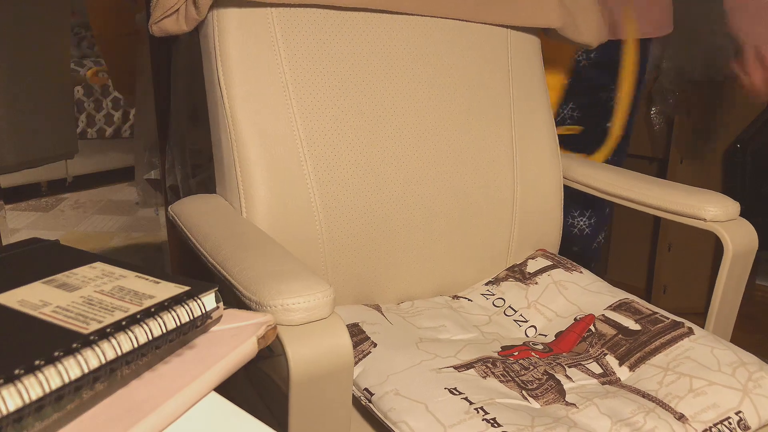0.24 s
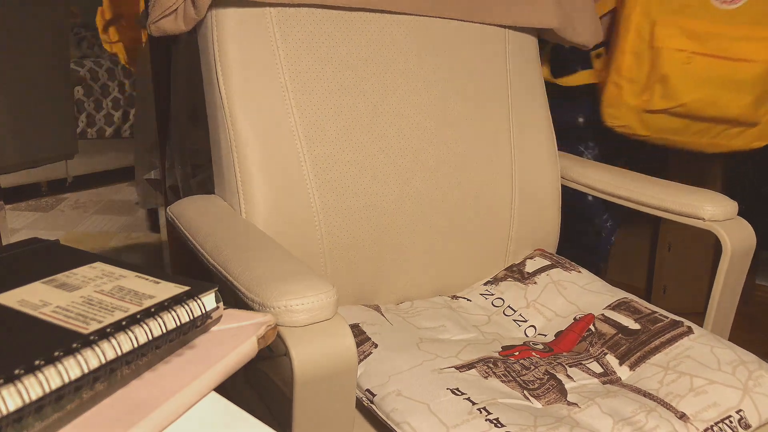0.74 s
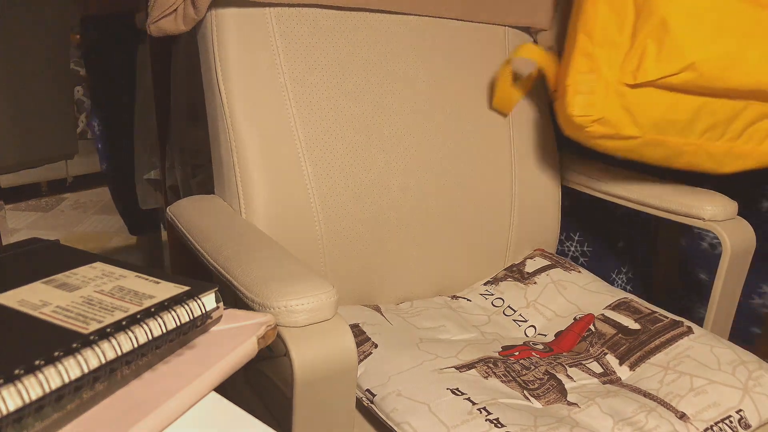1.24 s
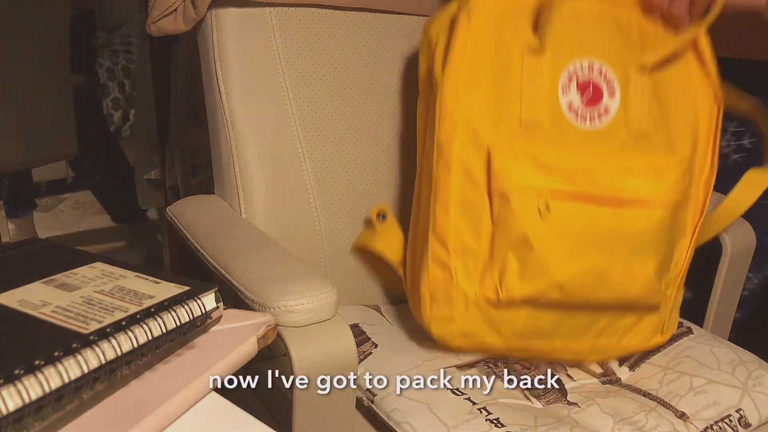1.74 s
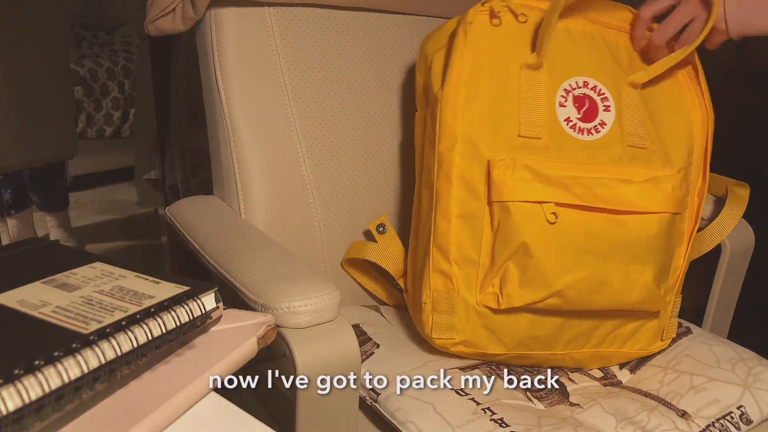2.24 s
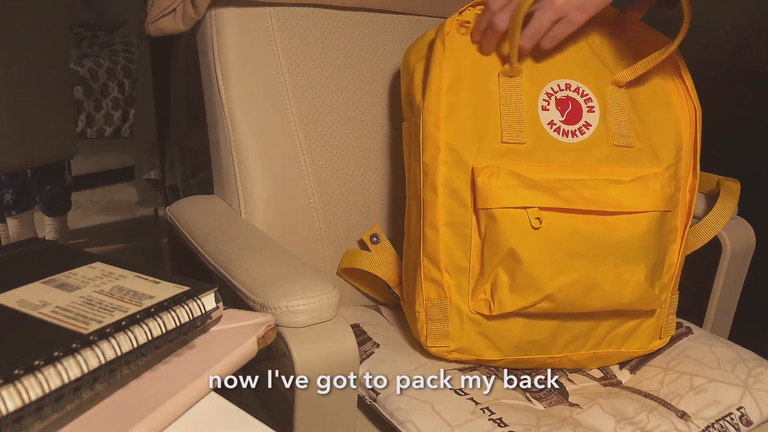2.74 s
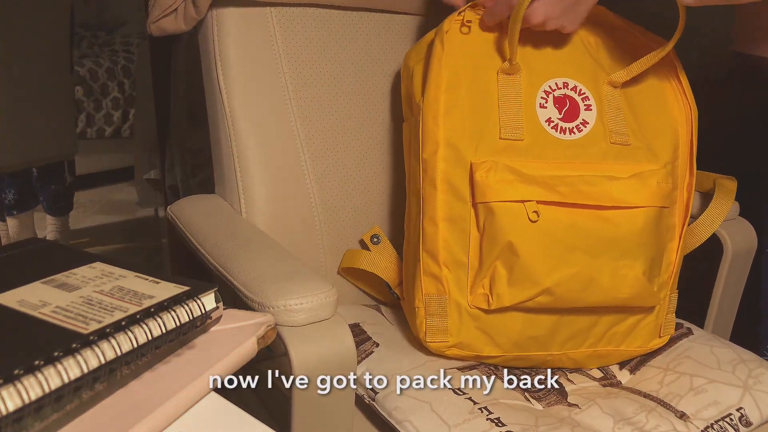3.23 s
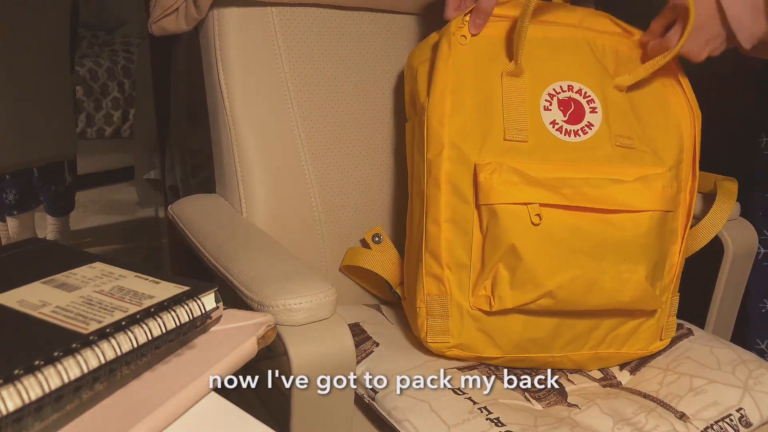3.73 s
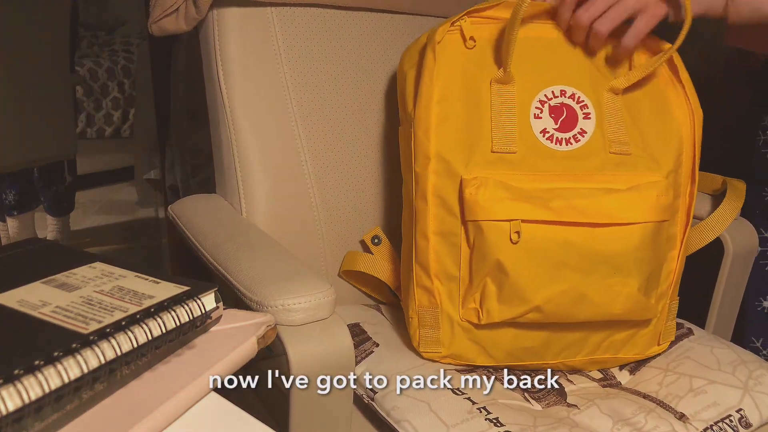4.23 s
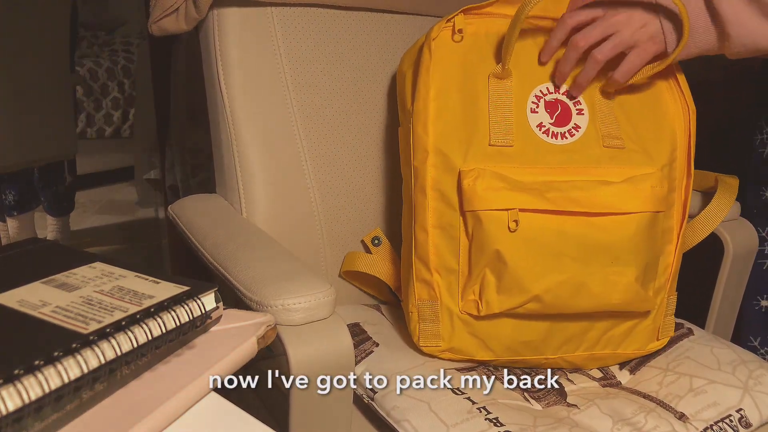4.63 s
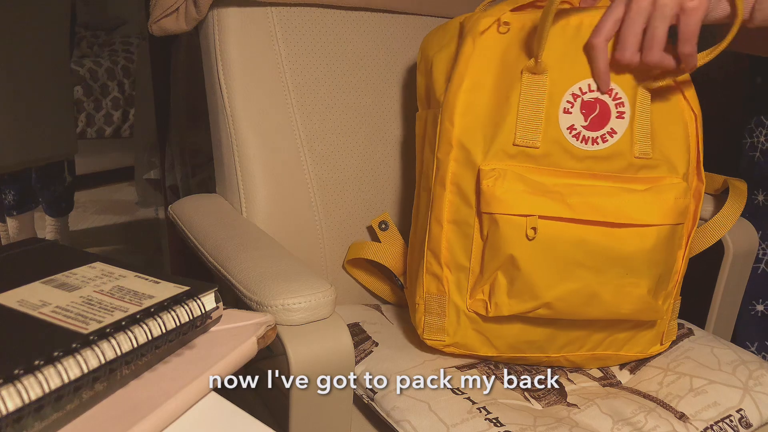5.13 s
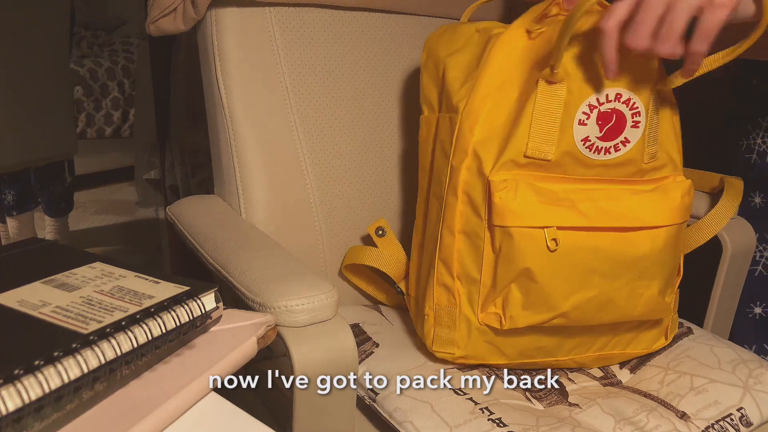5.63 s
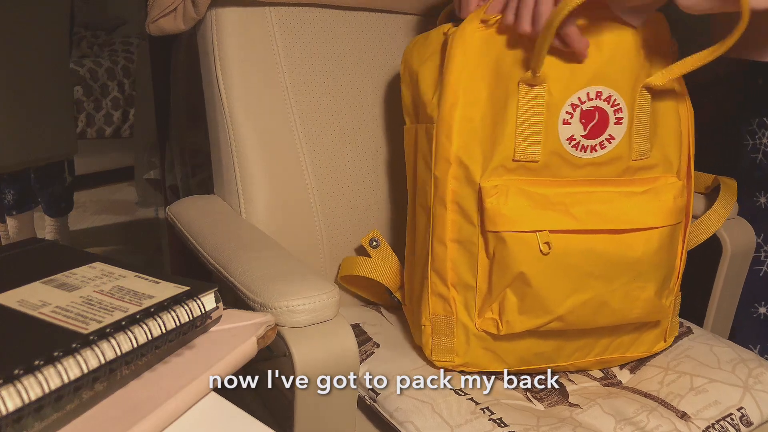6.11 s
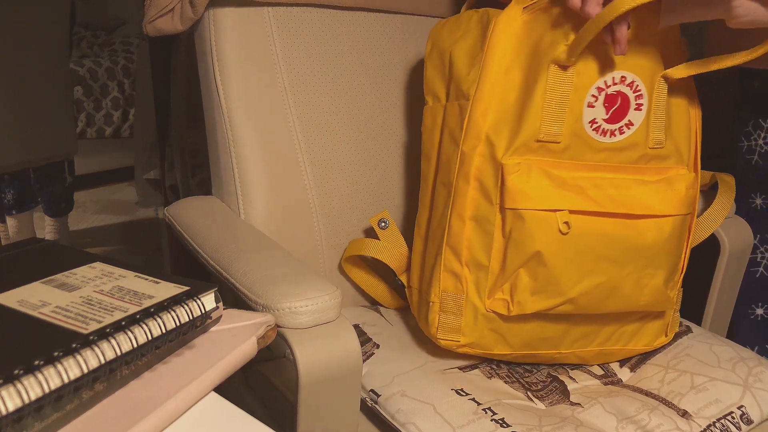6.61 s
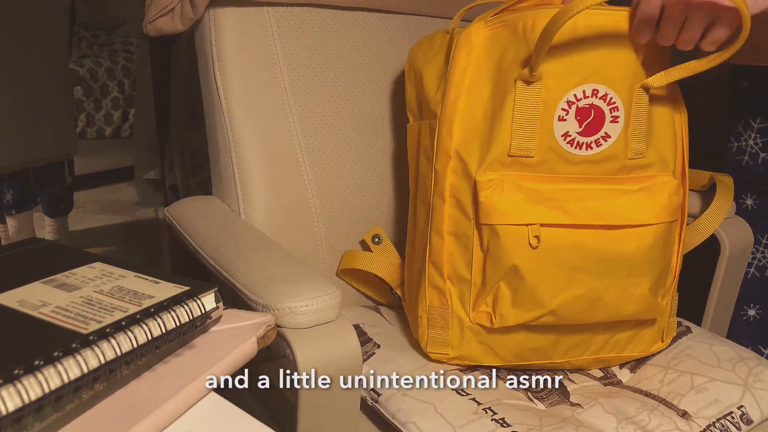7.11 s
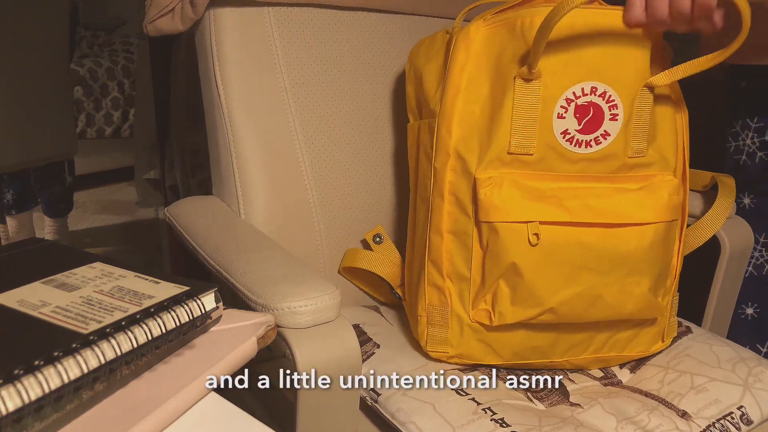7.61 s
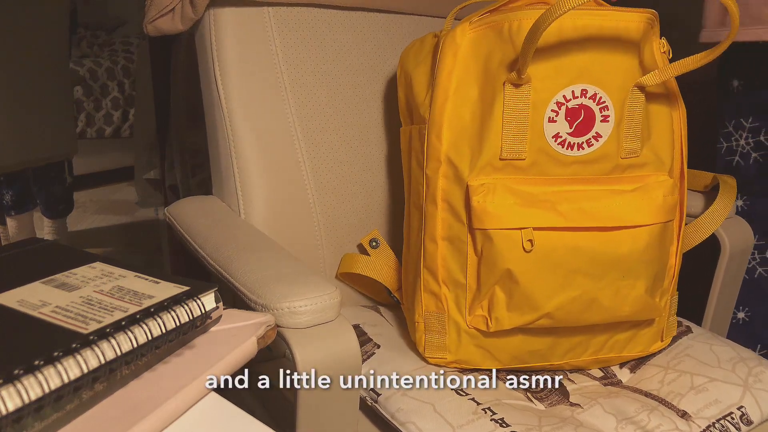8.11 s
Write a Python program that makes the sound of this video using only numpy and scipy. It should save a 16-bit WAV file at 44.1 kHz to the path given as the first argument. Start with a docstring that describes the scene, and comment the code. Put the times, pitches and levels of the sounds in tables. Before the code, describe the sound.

A canvas backpack lands on a padded chair with jingling metal, then short zipper rasps, cloth rubbing and hollow bumps in a quiet room.

```python
"""A small quiet room with one microphone near a chair: a canvas backpack is lifted onto it and handled.
The zipper is pulled in three strokes and a few single slips: tooth after tooth excites the tape and the bag.
Hands keep rubbing the cloth, made of dense random slips; bumps ring the hollow bag as a set of modes.
The metal pull tab jingles and rattles on its slider, and a plastic part is tapped.
Behind it lie sparse room reflections, a low rumble of the chair, and air and microphone hiss."""
import sys
import numpy as np
from scipy import signal
from scipy.io import wavfile
from scipy.ndimage import uniform_filter1d

SR = 44100
rng = np.random.default_rng(int(sys.argv[2]) if len(sys.argv) > 2 else 0)


def digitize_waveform(pressure):
    """Quantize a signal to 16-bit integers and store it at the path in sys.argv[1].

    Rows of a 2-D input are taken as channels; values are limited to [-1, 1].
    """
    field = np.atleast_2d(pressure).T
    bounded = np.clip(field, -1, 1)
    quanta = np.round(bounded * 32767).astype(np.int16)
    wavfile.write(sys.argv[1], SR, quanta)


N = 368543  # length in samples

# The zipper strokes, one list a stroke. Each row: time in s, teeth per s, pitch of the taut tape in Hz.
STROKE_SPEEDS = [
    [(2.722, 200, 1000), (2.775, 270, 1250), (2.8, 310, 2600), (2.83, 320, 3050), (2.89, 260, 3100),
     (2.92, 190, 2000), (2.96, 150, 1500)],
    [(3.34, 70, 1500), (3.375, 130, 1500), (3.4, 280, 1400), (3.43, 412, 1350), (3.455, 450, 1500),
     (3.478, 515, 1600), (3.52, 560, 1700), (3.535, 500, 1450), (3.565, 480, 1400), (3.585, 345, 1300),
     (3.608, 270, 1300), (3.63, 140, 1350), (3.71, 50, 1200)],
    [(5.285, 85, 1400), (5.35, 135, 1300), (5.39, 120, 1400), (5.43, 75, 1400)],
]
# The same strokes. Each row: time in s, thump into the large panels in dB, into the small panels in dB,
# knock of the teeth in dB.
STROKE_FORCES = [
    [(2.72, -62, -65, -62), (2.74, -54, -62, -59), (2.77, -57, -49, -44.5), (2.89, -55.5, -45.5, -47.5),
     (2.96, -64, -71, -64.5)],
    [(3.34, -50, -65, -67), (3.366, -46, -49, -54.5), (3.408, -42.5, -39.5, -46), (3.44, -35.5, -38, -38.5),
     (3.5, -34.5, -47.5, -37.5), (3.572, -28.5, -38, -41), (3.598, -35.5, -46, -43.5),
     (3.648, -42, -42.5, -54), (3.71, -47, -74, -66)],
    [(5.285, -53, -44.5, -53.5), (5.38, -43, -46.5, -52), (5.43, -43, -42.5, -60)],
]
# Each row, one a stroke: snagging of a slow pull (0-2), scraping against knock in dB.
STROKE_TRAITS = [(1.5, -2.5), (.4, -7), (0.55, -3.5)]
# A tooth's knock on the tape. Each row: frequency in Hz, level in dB.
TOOTH_SPECTRUM = [(400, -36.5), (900, 8.5), (1500, 8), (2300, 5.5), (3300, -3.5), (5000, -12), (9000, -35)]
# Scraping of the slider. Each row: frequency in Hz, level in dB.
SCRAPE_SPECTRUM = [(600, -21), (1200, 0), (2200, 0.5), (3500, 6), (5000, 1), (8000, -3), (12000, -6),
                   (16000, -3)]
# Single teeth letting go and bumps of the bag. Each row: time in s, thump peak in dB, tick peak in dB.
POPS = [(0.159, -52, -70), (0.338, -50, -70.5), (0.435, -51, -61), (0.611, -55, -71), (1.076, -41.5, -56),
        (1.235, -59, -45), (1.254, -46, -62), (1.777, -51, -36), (1.809, -49, -32.5), (1.866, -38.5, -38),
        (2.09, -53, -41), (2.17, -60, -48), (2.692, -50.5, -70), (2.725, -57, -57), (2.776, -43, -37),
        (3.316, -69, -49), (3.348, -45, -50), (3.749, -32.5, -38), (3.971, -43, -44), (4.038, -35.5, -46),
        (4.101, -28, -30.5), (4.157, -37, -36), (4.184, -59, -41), (4.25, -41, -36), (4.313, -56, -41),
        (4.362, -38.5, -60), (4.738, -53, -60), (4.837, -42.5, -64.5), (4.992, -53, -49), (5.018, -45, -52),
        (5.074, -32, -36), (5.112, -32, -31), (5.135, -41, -36), (5.164, -31, -31), (5.198, -38, -26.5),
        (5.213, -37.5, -51), (5.232, -45, -49), (5.256, -41, -55), (5.274, -38, -39), (5.379, -30.5, -37),
        (5.438, -32, -37), (5.457, -30.5, -57.5), (5.474, -54, -40), (5.507, -32.5, -24.5),
        (5.7, -43.5, -46.5), (6.068, -44, -43), (6.116, -31, -62), (6.206, -35.5, -50), (6.235, -52, -45.5),
        (6.307, -32, -41), (6.385, -29.5, -37.5), (6.415, -60, -38), (6.483, -31, -34),
        (6.55, -30.5, -36.5), (6.838, -42.5, -41.5), (6.862, -44.5, -65.5), (7.046, -57.5, -81),
        (7.333, -48, -67), (7.482, -54, -62)]
# A tooth's edge. Each row: frequency in Hz, level in dB per Hz.
CONTACT_SPECTRUM = [(800, -2.5), (2000, 6), (4500, 3.5), (8000, -5.5), (16000, -9.5)]
# The hollow bag, large panels first. Each row: mode in Hz, level in dB, t60 in s.
BAG_MODES = [(141, -6, 0.11), (238.5, -6, 0.17), (273.8, 1, 0.1), (315, 3.5, 0.066), (369, -15, 0.14),
             (499, -6.5, 0.041), (545.5, -2.5, 0.046), (605, -29, 0.0072), (724, -7.5, 0.04),
             (1018, -17, 0.1), (964, -22.5, 0.07), (1385, -12.5, 0.044), (1730, -14.5, 0.024)]
# The pull tab hits the slider. Each row: time in s, clack peak in dB, high ring peak in dB, low ring peak in dB.
JINGLES = [(1.814, -29, -54, -50), (1.8317, -34, -45, -61), (1.8647, -50, -62, -61),
           (1.8906, -36, -59, -42), (1.897, -23.5, -53, -57), (1.9065, -37, -44, -57),
           (1.921, -38, -55, -56), (1.944, -20.5, -33, -52), (1.9603, -27, -46, -34),
           (1.983, -36, -47, -47), (2.092, -32, -67, -66), (2.186, -40, -55, -75), (2.2603, -45, -63, -69),
           (2.874, -33, -50, -55), (4.0104, -30.5, -38, -46), (4.111, -40, -32, -52),
           (4.156, -18, -52, -59), (4.164, -43, -52, -55), (4.586, -23.5, -37, -38),
           (4.8544, -51, -52, -63), (5.0792, -30, -52, -58), (5.1175, -30, -48, -50),
           (5.143, -34, -46, -43), (5.17, -40, -42, -42), (5.199, -42, -32.5, -41), (5.3502, -49, -49, -65),
           (5.5073, -30, -45, -48), (5.5298, -53, -51, -45), (5.799, -42, -43, -67), (5.853, -48, -54, -65)]
# The loose tab keeps rattling. Each row: start in s, length in s, high ring in dB, low ring in dB.
RATTLES = [(1.803, 0.057, -57, -58), (1.887, 0.13, -69, -52), (4.092, 0.18, -63, -62),
           (5.072, 0.15, -54, -58.5), (5.171, 0.094, -54, -52), (5.495, 0.082, -50, -50.5),
           (5.782, 0.092, -60, -65)]
# The slider body, before any damping. Each row: mode in Hz, level in dB, t60 in s.
SLIDER_MODES = [(8600, -17, 0.0037), (8630, -12, 0.017), (10100, 1.5, 0.004), (10900, -36, 0.0091),
                (14630, -5.5, 0.007), (16600, -5, 0.015)]
# The pull tab's close high pair, before any damping. Each row: mode in Hz, level in dB, t60 in s.
TAB_HIGH_MODES = [(12780, -2, .055), (12920, 0, .055)]
# The pull tab's low modes, before any damping. Each row: mode in Hz, level in dB, t60 in s.
TAB_LOW_MODES = [(5610, 0, .06), (7620, -5, .05)]
# A plastic part is tapped and bounces. Each row: time in s, level in dB, pitch in Hz.
BUCKLE_TAPS = [(2.348, -36, 2740), (2.365, -43, 2550), (2.379, -45, 2550)]
# Hands grip and slide on the canvas, one row a move. Each row: start in s, length in s, share of it spent
# swelling (0-1), push on the panels in dB, drag on the seams in dB, slide in dB, brightness in dB.
HAND_MOVES = [(0, 0.094, 0, -54.5, -64, -66.5, 0.5), (0.156, 0.15, 0.2, -53, -65, -68.5, 1),
              (0.325, 0.055, 0.4, -57, -65, -73, 0), (0.383, 0.18, 0.44, -56, -64, -72, 0),
              (0.606, 0.14, 0.5, -60.5, -72.5, -79, 4), (0.805, 0.17, .26, -55.5, -67, -64, 1.5),
              (0.938, 0.15, 0.56, -53.5, -60.5, -59, 3.5), (1.024, 0.17, 0.63, -51, -71, -58, 4),
              (1.156, 0.18, 0.5, -50, -73, -60, 4.5), (1.295, 0.12, 0.27, -53, -66, -63.5, 1),
              (1.41, 0.098, 0.5, -63, -73, -76, -3), (1.483, 0.12, 0.84, -51.5, -58.5, -59, -3),
              (1.573, 0.34, 0.22, -55, -62, -58, 0.5), (1.744, 0.18, 0.27, -40, -53, -55, 2.5),
              (1.878, .14, 0.17, -46, -55, -57.5, 6), (2.061, 0.12, 0.62, -49, -57, -57.5, -2),
              (2.155, 0.082, 0.3, -53, -53, -51, -1), (2.248, 0.1, 0.4, -53.5, -51.5, -58.5, 2),
              (2.34, 0.068, 0.2, -55, -64, -53.5, -3), (2.383, 0.14, 0, -50.5, -53.5, -60, -8),
              (2.507, .15, 0.2, -54, -53.5, -59, -15.5), (2.934, 0.07, 0.4, -53, -56.5, -60.5, 9),
              (3.014, 0.042, .33, -54, -54, -59, 6), (3.091, 0.14, 0.54, -70, -66.5, -66, 3.5),
              (3.233, 0.2, 0.95, -59, -65, -67.5, 3), (3.711, 0.15, 0, -50.5, -60, -66.5, -1),
              (3.78, 0.25, 0.63, -57, -56.5, -60, -15), (3.968, 0.18, 0.38, -54, -54.5, -57.5, 6.5),
              (4.053, 0.16, 0.64, -45.5, -48.5, -51.5, 7.5), (4.216, .11, 0.48, -52, -50.5, -57.5, -4),
              (4.318, 0.24, 0.1, -52, -47.5, -56.5, 2), (4.463, 0.13, 0.93, -53.5, -47, -52, 0.5),
              (4.572, 0.095, 0.5, -48.5, -48, -67, 14.5), (4.7, 0.084, 0.78, -57.5, -59.5, -67.5, -7),
              (4.773, 0.096, 0.51, -51, -59, -58, 3), (4.86, 0.18, 0.22, -52, -62, -60.5, 6),
              (5.001, 0.063, 0.34, -48, -52.5, -54.5, 4.5), (5.081, 0.21, 0.2, -40.5, -47.5, -56.5, -3),
              (5.176, 0.16, 0.15, -38.5, -49, -57, -13), (5.316, 0.15, 0.1, -40.5, -54, -56, -3),
              (5.479, 0.12, 0.38, -41.5, -45, -55.5, 7.5), (5.65, 0.11, 0.5, -58, -53, -58, 0.5),
              (5.771, 0.17, 0.49, -53.5, -55, -55.5, 2.5), (5.931, 0.16, 0.69, -59.5, -57, -61, 4.5),
              (6.07, 0.27, 0.94, -51.5, -60, -63.5, -2), (6.33, 0.47, 0.2, -50, -59.5, -69, -6),
              (6.575, 0.14, 0.9, -62, -62, -59.5, 3), (6.685, 0.15, 0.66, -57.5, -53.5, -58, 7.5),
              (6.828, 0.088, 0, -52, -69, -66.5, 9), (6.92, 0.17, 0.2, -76, -84, -74, 10),
              (7.171, 0.16, 0, -65.5, -69.5, -71, 4.5), (7.335, 0.049, .6, -61, -69, -84, 11),
              (7.42, 0.37, 0.11, -64.5, -69, -73, 3), (7.58, 0.12, .7, -66, -61, -64, 0.5),
              (7.678, 0.1, .4, -70, -74, -70, 8.5), (7.79, .24, 0, -76, -81, -81, 6),
              (8.043, 0.13, 0.6, -73, -78, -75, 0)]
# Scraped seams. Each row: frequency in Hz, level in dB per Hz.
SEAM_SPECTRUM = [(200, -27.5), (500, 7.5), (800, 4), (1300, 1.5), (2000, -13.5), (4000, -18.5)]
# Rubbed weave. Each row: frequency in Hz, level in dB per Hz.
WEAVE_SPECTRUM = [(600, -34.5), (1500, 2), (2800, -2), (4500, -2.5), (7000, -16.5), (12000, -24)]
# Hiss of the fibres. Each row: frequency in Hz, level in dB per Hz.
FIBRE_SPECTRUM = [(2500, -22.5), (5000, 0.5), (7000, 0), (10000, -5), (13000, -5), (16000, -11.5)]
# The chair under the load. Each row: frequency in Hz, level in dB per Hz.
CHAIR_SPECTRUM = [(20, -63), (45, 5), (80, 3), (150, 3.5), (250, -33.5)]
# Room air and microphone hiss. Each row: frequency in Hz, level in dB per Hz.
AIR_SPECTRUM = [(15, -44), (25, -9), (97, -32.5), (439, -3.5), (624, -21), (714, -17), (2110, -20.5),
                (11000, -24), (14800, -24.5), (16000, -18.5)]

SMOOTHING_PER_S = 300  # teeth per s; the faster the pull, the more evenly the teeth pass
LURCH, LURCH_S = .12, .03  # the hand pulls unevenly: added snagging that comes and goes
SNAP_TOP_HZ = 1610  # most treble that leads a snap, above its low end
BLUNT_DB, BLUNT_SPAN_DB = -18.75, 11.5  # a tick further under its thump than the first has a duller front
RATTLE_FADE_DB = -14.5  # over the length of a rattle
# stretched seams sing in a band that drifts; so does the rubbed weave, higher up
SEAM_HZ, SEAM_WANDER_DB, SEAM_WIDTH_HZ, SEAM_LIFT = 825, 3, 270, 1.07
WEAVE_HZ, WEAVE_WANDER_DB, WEAVE_WIDTH_HZ, WEAVE_LIFT = 3310, 2.5, 700, 0.92
# every move: below its top at the start, at its end, then the release
SWELL_DB, SAG_DB, LET_GO_DB_PER_S = -7.5, -9.5, 392
FIBRE_DB = -7  # hiss of the fibres against the slide, before each move's brightness
REST_PUSH_DB, REST_DRAG_DB, REST_SLIDE_DB = -74.5, -78.5, -80.5  # the bag settling between moves
ROOM_DB, ROOM_T60_S = -11.5, 0.34
AIR_DB = -74
EDGE_HZ = 15850  # upper band limit


def zipper_stroke(speed, force, snag, scrape_db):
    """The slider meets tooth after tooth: each thumps the bag, knocks on the tape and leaves a puff of scraping."""
    speed_s, teeth_per_s, pitch_hz = np.transpose(speed)
    force_s, *force_levels = np.transpose(force)
    start, end = speed_s[0], speed_s[-1]
    t = np.arange(start, end + .1, 1 / SR)
    n = len(t)
    moving = t < end
    rate = np.interp(t, speed_s, teeth_per_s)
    tape_hz = np.interp(t, speed_s, pitch_hz)
    large, small, knock = (gain_of(np.interp(t, force_s, db)) for db in force_levels)

    lurch = LURCH * np.maximum(wander(LURCH_S)[:n], 0)
    uneven = snag * np.exp(-rate / SMOOTHING_PER_S) + lurch
    uneven_rate = rate * gain_of(5 * uneven * wander(.003)[:n])
    teeth_passed = np.cumsum(uneven_rate) / SR
    teeth = np.diff(np.floor(teeth_passed), prepend=0) * moving
    teeth *= gain_of(7 * uneven * rng.standard_normal(n))
    teeth *= np.sqrt(SR / rate)  # equal power at any speed
    since_tooth = (teeth_passed % 1) / rate
    puff = 0.5 + np.exp(-since_tooth / 0.0022)
    scrape = puff * grains(9000, 2.8)[:n] * moving
    push = teeth + 1.09 * uneven * evened(scrape)  # an uneven pull also shakes the cloth between teeth

    out = np.zeros(n)
    for gain, modes in ((large, BAG_MODES[:5]), (small, BAG_MODES[5:])):
        panels = ring(modes)
        out += signal.oaconvolve(push * gain, panels)[:n] / np.linalg.norm(panels)
    scrape_gain = knock * gain_of(scrape_db)
    for gain, drive, spectrum, tape_lift in ((knock, push, TOOTH_SPECTRUM, 1.8),
                                             (scrape_gain, scrape, SCRAPE_SPECTRUM, 2.4)):
        contact = coloured(drive, spectrum)
        out += gain * evened(contact + tape_lift * resonate(contact, tape_hz, 450.0))
    return start, out


def snap(top_hz):
    """A tooth letting go: bending waves in the taut tape arrive treble first, then the bag rings on."""
    t = np.arange(1100) / SR
    hz = 285 * rng.uniform(.92, 1.08) + top_hz * np.exp(-t / .0016)
    envelope = np.minimum(t / 0.0074 + 0.3, 1) * np.exp(-(t / 0.012) ** 1.34)
    sweep = np.sin(2 * np.pi * np.cumsum(hz) / SR) * envelope
    body = signal.oaconvolve(np.hanning(30), ring(BAG_MODES, scatter=12.0, detune=0.019))
    return peaked(np.pad(sweep, (0, len(body) - len(t))) + 0.48 * peaked(body))


def tick():
    """A few milliseconds of crackle at the contact."""
    t = np.arange(500) / SR
    crackle = rng.standard_normal(500) * np.exp(-t / 0.0033)
    crackle[0] = 4.3  # the edge slips off at once
    return peaked(coloured(crackle, CONTACT_SPECTRUM))


def pop(thump_db, tick_db):
    """A snap and a tick from one start; a weak tick goes with a duller snap."""
    sharpness = np.clip(1 + (tick_db - thump_db - BLUNT_DB) / BLUNT_SPAN_DB, .15, 1)
    out = gain_of(thump_db) * snap(SNAP_TOP_HZ * sharpness)
    add(out, 0, gain_of(tick_db) * tick())
    return out


def jingle(clack_db, high_db, low_db):
    """The tab lands and chatters on the slider for a few milliseconds, ringing the modes of both."""
    t = np.arange(700) / SR
    chatter = rng.standard_normal(700) * (rng.random(700) < .04) * .9 * np.exp(-(t / .007) ** 2)
    chatter[0] = 1
    clack = ring(SLIDER_MODES, scatter=4.2, detune=0.019)
    clack[:60] += 1.8 * rng.standard_normal(60) * np.exp(-np.arange(60) / 7.6)  # the contact itself
    high = ring(TAB_HIGH_MODES, scatter=3.9, detune=0.0037)
    low = ring(TAB_LOW_MODES, scatter=2.8, detune=0.0068)
    held = gain_of(-60 * np.arange(9000) / SR / 0.028)  # fingers and cloth soon damp the metal
    parts = ((clack_db, clack), (high_db, high), (low_db, low))
    return sum(gain_of(db) * peaked(signal.oaconvolve(chatter, held * x)) for db, x in parts)


def rattle(start, length, high_db, low_db):
    """Many small knocks keep both rings of the tab alive, then tire."""
    t = np.arange(0, length, 1 / SR)
    n = len(t)
    knocks = grains(310, 1.8)[:n] * signal.windows.tukey(n, .1)
    out = np.zeros(n)
    for db, modes in ((high_db, TAB_HIGH_MODES), (low_db, TAB_LOW_MODES)):
        out += gain_of(db) * evened(signal.oaconvolve(knocks, ring(modes))[:n])
    fade = gain_of(RATTLE_FADE_DB * t / length) * signal.windows.tukey(n, .3)
    return start, fade * out


def buckle_tap(db, hz):
    """A tapped plastic part: one mode that dies within 20 ms."""
    return gain_of(db) * ring([(hz, 0, .02)])


def cloth():
    """Slips under the hands flex the panels and scrape seams and weave; all share one uneven grip."""
    flex_db, drag_db, rub_db, hiss_db = hands()
    grip = wander(0.032)

    panels = ring(BAG_MODES)
    slips = gain_of(flex_db + 1.94 * grip) * grains(900, 2.25)
    flex = signal.oaconvolve(slips, panels)[:N] / np.linalg.norm(panels)

    seams = coloured(grains(2500, 0.71), SEAM_SPECTRUM)
    seam_hz = SEAM_HZ * gain_of(SEAM_WANDER_DB * wander(0.058))
    seams = seams + SEAM_LIFT * resonate(seams, seam_hz, SEAM_WIDTH_HZ)
    drag = evened(seams) * gain_of(drag_db + 2.5 * grip + 0.5 * wander(0.013))

    weave = coloured(grains(6000, 2.1), WEAVE_SPECTRUM)
    weave_hz = WEAVE_HZ * gain_of(WEAVE_WANDER_DB * wander(0.079))
    weave = weave + WEAVE_LIFT * resonate(weave, weave_hz, WEAVE_WIDTH_HZ)
    rub = evened(weave) * gain_of(rub_db + 0.62 * grip + 1.83 * wander(0.0042))

    fibres = coloured(grains(13000, 1.0), FIBRE_SPECTRUM)
    hiss = evened(fibres) * gain_of(hiss_db + 1.4 * grip + 2.27 * wander(.004))
    return flex + drag + rub + hiss


def hands():
    """Four levels over time (dB): the moves overlap as powers above the resting level."""
    columns = np.transpose(HAND_MOVES)[:, :, None]
    start, length, swelling, push_db, drag_db, slide_db, bright_db = columns
    frames = np.arange(0, N / SR, 1 / 500)
    t = frames - start
    top = length * np.clip(swelling, .02, .98)
    swell_db = SWELL_DB * np.clip(1 - t / top, 0, 1)
    sag_db = SAG_DB * np.clip((t - top) / (length - top), 0, 1)
    release_db = -LET_GO_DB_PER_S * np.maximum(t - length, 0)
    shape = gain_of(swell_db + sag_db + release_db) * np.clip(t / 0.014, 0, 1)
    layers = ((push_db, REST_PUSH_DB), (drag_db, REST_DRAG_DB), (slide_db, REST_SLIDE_DB),
              (slide_db + FIBRE_DB + bright_db, REST_SLIDE_DB + FIBRE_DB))
    levels = []
    for db, rest_db in layers:
        power = ((shape * gain_of(db)) ** 2).sum(0) + gain_of(2 * rest_db)
        levels.append(np.interp(np.arange(N) / SR, frames, 10 * np.log10(power)))
    return levels


def chair():
    """A low rumble of filtered noise, always there and stronger while the bag is pushed about."""
    push_db = uniform_filter1d(hands()[0], 6000)
    level_db = -70.0 + 0.58 * (push_db + 61) + 3.8 * wander(0.019)
    return evened(coloured(rng.standard_normal(N), CHAIR_SPECTRUM)) * gain_of(level_db)


def room(x):
    """Sparse reflections of random sign, dying away, with less bass and top than the direct sound."""
    at = np.arange(250, 15000, 20) + rng.integers(0, 20, 738)
    taps = np.zeros(15020)
    taps[at] = rng.choice([-1., 1.], 738) * gain_of(-60 * at / SR / ROOM_T60_S)
    taps = coloured(taps, [(100, -12.5), (2000, 0.5), (16000, -6.0)])
    return signal.oaconvolve(x, taps / np.linalg.norm(taps))[:N]


def still_air():
    """Room air and microphone hiss: steady noise with a fixed spectrum."""
    return gain_of(AIR_DB) * evened(coloured(rng.standard_normal(N), AIR_SPECTRUM))


def gain_of(db):
    """Decibels to gain."""
    return 10 ** (np.asarray(db) / 20)


def evened(x):
    """Scales to an rms of 1."""
    return x / np.sqrt(np.mean(x ** 2) + 1e-20)


def peaked(x):
    """Scales to a peak of 1."""
    return x / np.max(abs(x))


def coloured(x, spectrum):
    """Filters x by a spectrum; the phase follows from the gain, so that clicks keep a sharp front."""
    f, db = np.transpose(spectrum)
    hz = abs(np.fft.fftfreq(8192, 1 / SR))
    log_gain = np.log(gain_of(np.interp(np.log(hz + 1), np.log(f), db)))
    taps = np.fft.ifft(np.exp(np.conj(signal.hilbert(log_gain)))).real
    return signal.oaconvolve(x, taps[:4096])[:len(x)]


def ring(modes, scatter=0., detune=0.):
    """Response of a set of modes to one blow; where it lands scatters the levels (dB) and pitches (share)."""
    hz, db, t60 = np.transpose(modes)[:, :, None]
    t = np.arange(9000) / SR
    db = db + scatter * rng.standard_normal(db.shape)
    hz = hz * (1 + detune * rng.standard_normal(hz.shape))
    return (gain_of(db - 60 * t / t60) * np.sin(2 * np.pi * hz * t)).sum(0)


def resonate(x, hz, width):
    """Shifts the curve hz down to zero, smooths, and shifts back: a resonance that can move."""
    turn = np.exp(2j * np.pi * np.cumsum(hz) / SR)
    r = np.exp(-np.pi * width / SR)
    return 2 * (turn * signal.lfilter([1 - r], [1, -r], x / turn)).real


def wander(width):
    """Slow random drift of rms 1, smooth over width seconds."""
    size = max(round(width * SR), 2)
    return evened(uniform_filter1d(uniform_filter1d(rng.standard_normal(N), size), size))


def grains(per_s, spread_db):
    """Sparse slips of random sign and rms 1, most small and a few large."""
    size = gain_of(spread_db * np.minimum(rng.exponential(1, N), 5))
    return evened(size * rng.choice([-1., 1.], N) * (rng.random(N) < per_s / SR))


def add(mix, s, sound):
    """Mixes a sound in at time s."""
    part = mix[round(s * SR):][:len(sound)]
    part += sound[:len(part)]


def scene():
    """Zipper, hardware and cloth in the room, over the chair and the still air."""
    near = cloth()
    for speed, force, traits in zip(STROKE_SPEEDS, STROKE_FORCES, STROKE_TRAITS):
        add(near, *zipper_stroke(speed, force, *traits))
    for s, thump_db, tick_db in POPS:
        add(near, s, pop(thump_db, tick_db))
    for s, *levels in JINGLES:
        add(near, s, jingle(*levels))
    for row in RATTLES:
        add(near, *rattle(*row))
    for s, db, hz in BUCKLE_TAPS:
        add(near, s, buckle_tap(db, hz))
    no_deep_bass = signal.butter(4, 118, "high", fs=SR, output="sos")  # a small bag radiates none
    near = signal.sosfilt(no_deep_bass, near)
    return (near + gain_of(ROOM_DB) * room(near) + chair() + still_air())[None]


def record(dry):
    """The microphone rolls off the deep bass; then the band limit."""
    x = signal.sosfilt(signal.butter(2, 45, "high", fs=SR, output="sos"), dry)
    band_limit = signal.firwin(511, EDGE_HZ, window=("kaiser", 9), fs=SR)
    return signal.oaconvolve(x, band_limit[None], "same")


dry = scene()
out = record(dry)
digitize_waveform(out)
```